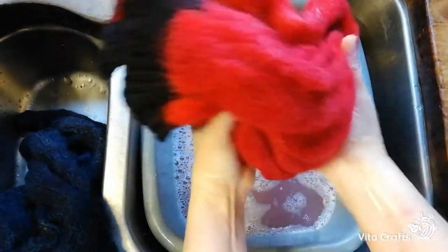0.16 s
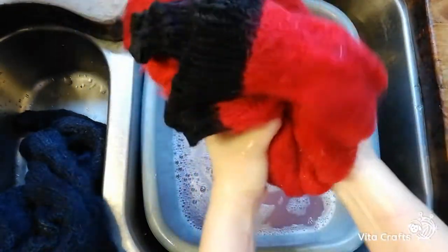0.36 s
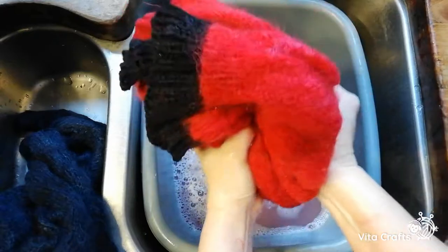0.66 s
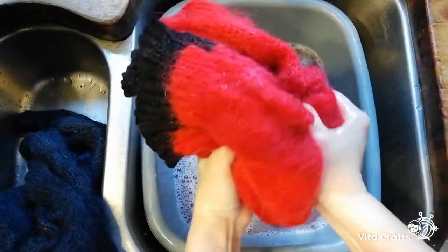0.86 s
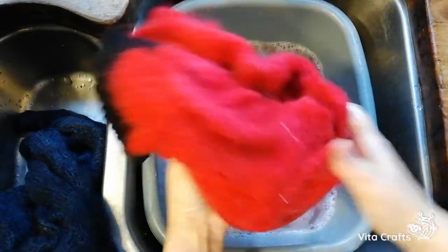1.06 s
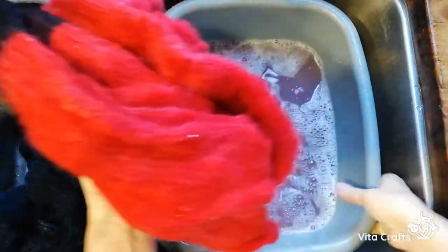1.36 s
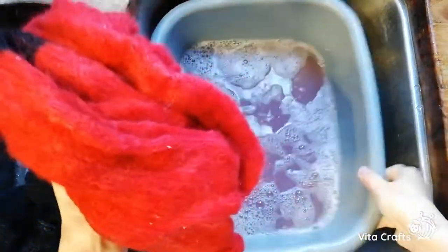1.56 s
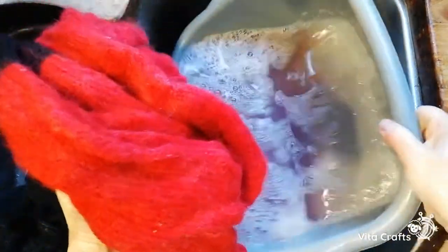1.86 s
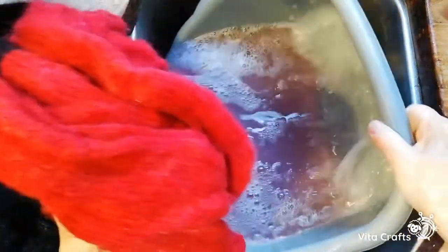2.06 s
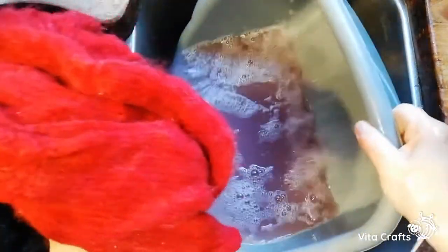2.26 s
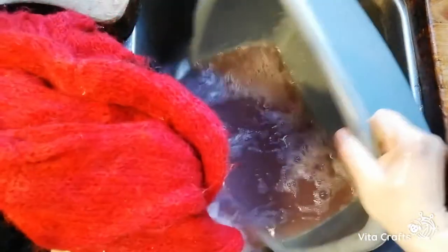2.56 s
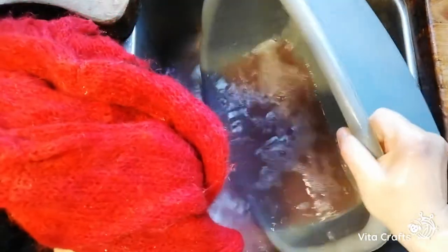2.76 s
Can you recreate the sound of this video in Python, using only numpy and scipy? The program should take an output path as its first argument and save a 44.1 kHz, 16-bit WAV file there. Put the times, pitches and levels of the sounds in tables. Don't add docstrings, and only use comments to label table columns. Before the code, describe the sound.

Water wrung from wet wool patters into a plastic basin, which then scrapes, knocks and pours

```python
import sys
import numpy as np
from scipy import signal
from scipy.io import wavfile

SR = 44100
rng = np.random.default_rng(int(sys.argv[2]) if len(sys.argv) > 2 else 0)


def generate_wav(sig):
    pcm = np.round(np.clip(np.atleast_2d(sig).T, -1, 1) * 32767).astype(np.int16)
    wavfile.write(sys.argv[1], SR, pcm)


def elevation(decibels):
    levels = np.asarray(decibels, float)
    return 10 ** (levels / 20)


N = 127890

# time [s], spatter level [dB], large bubbles relative to spatter [dB].
FLOW = [
    [(0, -95, 20), (.256, -54, -3), (.42, -51, -16), (.56, -39, -6), (.728, -39.5, -5.5), (.95, -46, -5.5),
     (1.106, -61, -11), (1.23, -74.5, 11.5)],
    [(1.4, -69.5, 10), (1.46, -49.5, 5.5), (1.6, -44.5, 1.5), (1.73, -48.5, 2), (1.79, -59, 1),
     (1.9, -74, 17.5)],
]
# start [s], spatter level [dB], fall
# [dB/s], large bubbles re spatter [dB].
SURGES = [(0.434, -37, 62, -11), (0.493, -41.5, 51, 4.5), (1.244, -47.5, 252, 4.5), (1.344, -46, 368, 10),
          (1.904, -48, 100, -7), (1.927, -34.5, 127, -3.5), (2.076, -38, 100, -20), (2.094, -32, 72, -4),
          (2.236, -32.5, 61, -4), (2.3, -41, 81, -19), (2.388, -34, 31, -1.5), (2.448, -39, 60, 9.5),
          (2.527, -31.5, 78, 2), (2.639, -38, 115, 8), (2.72, -72, 110, 2), (2.8, -51, 77, 8.5)]
# frequency [Hz], density [dB per Hz].
SPATTER_SPECTRUM = [(530, 37), (900, -20), (1170, -8.5), (1620, -11), (2270, -5.5), (3730, -6.5),
                    (8660, -3.5), (14900, -27), (16000, -21)]
# start [s], peak level [dB], pitch [Hz].
DROPS = [(0.0261, -31.5, 6030), (0.028, -28.5, 13200), (0.1127, -40, 5300), (0.1455, -37, 8240),
         (0.203, -41, 8200), (0.21, -28.5, 5450), (0.25, -28.5, 7550), (0.3302, -35, 8260),
         (0.391, -30, 5640), (0.4051, -19.5, 8040), (0.41, -21.5, 6400), (0.4471, -7, 7270),
         (0.495, -18.5, 6400), (0.5099, -15, 4430), (0.5487, -28, 9200), (0.6195, -23, 12200),
         (0.6259, -15, 4180), (0.642, -21.5, 9500), (0.6536, -24, 3960), (0.6952, -20.5, 4370),
         (0.7307, -21.5, 7000), (0.764, -21, 3430), (0.7661, -24, 10300), (0.849, -31, 14000),
         (0.8855, -16.5, 5700), (0.932, -23.5, 8880), (1.0745, -33, 13500), (2.5306, -13, 5200),
         (2.6424, -11.5, 8620), (2.72, -21.5, 4500), (2.7628, -22, 6960)]
# start [s], peak level [dB], pitch [Hz], t60 [s].
PLOPS = [(0.279, -40, 1760, 0.064), (0.295, -43, 3260, 0.071), (0.408, -37, 2890, 0.039),
         (0.439, -30, 2680, 0.03), (0.449, -32, 1910, 0.03), (0.45, -29, 2430, 0.037),
         (0.476, -27.5, 2620, 0.046), (0.509, -33, 1070, 0.018), (0.527, -31, 1110, 0.023),
         (0.589, -32, 3220, 0.034), (0.629, -34, 1830, 0.092), (0.647, -30.5, 1175, 0.044),
         (0.664, -49, 660, 0.07), (0.699, -31.5, 4290, 0.041), (0.81, -34.5, 5450, 0.03),
         (0.896, -28.5, 2720, 0.035), (0.911, -38.5, 1140, 0.046), (0.97, -41, 2110, 0.04),
         (1.03, -37, 2220, 0.018), (1.034, -39.5, 2700, 0.037), (1.062, -36.5, 1126, 0.059),
         (1.063, -45, 794, 0.066), (1.08, -46, 1136, 0.1), (1.115, -43, 3860, 0.032),
         (1.144, -53, 1090, 0.15), (1.256, -43, 1074, 0.063), (1.915, -39, 1500, 0.04),
         (1.926, -26.5, 1790, 0.026), (1.987, -34, 1600, 0.022), (2.077, -38, 2580, 0.04),
         (2.118, -29.5, 1273, 0.081), (2.135, -19.5, 820, 0.016), (2.149, -30, 1260, 0.15),
         (2.188, -36, 2320, 0.024), (2.238, -29, 1113, 0.14), (2.26, -34, 1930, 0.088),
         (2.291, -29, 1500, 0.12), (2.385, -23.5, 1120, 0.029), (2.399, -24.5, 880, 0.034),
         (2.471, -23.5, 2790, 0.03), (2.543, -27, 1340, 0.079), (2.652, -16.5, 1138, 0.036),
         (2.699, -25.5, 1660, 0.038)]
# time [s], level [dB].
RUB = [
    [(1.235, -48), (1.25, -48), (1.31, -39), (1.35, -37), (1.43, -40.5), (1.5, -38.5), (1.72, -37.5),
     (1.9, -47)],
    [(1.93, -39.5), (2.05, -45), (2.13, -38), (2.4, -41.5), (2.47, -32.5), (2.6, -36.5), (2.9, -47.5)],
]
# start [s], peak level [dB], pitch favoured by the struck spot [Hz].
KNOCKS = [(0.072, -47.5, 740), (0.137, -44.5, 544), (0.181, -36.5, 524), (0.202, -43, 540),
          (0.26, -37, 390), (0.437, -32, 700), (0.49, -25, 506), (0.509, -42, 554), (0.625, -24.5, 450),
          (0.662, -19.5, 453), (0.753, -25, 486), (0.856, -35.5, 460), (0.882, -35, 475), (0.961, -31, 540),
          (1.241, -30, 440), (1.253, -30.5, 420), (1.28, -34, 426), (1.327, -21, 330), (1.347, -18, 560),
          (1.36, -26, 480), (1.396, -28.5, 250), (1.476, -23, 330), (1.495, -24.5, 282), (1.564, -25, 340),
          (1.6, -22.5, 430), (1.7, -21, 284), (1.808, -25, 490), (1.938, -17, 510), (2.101, -36, 324),
          (2.131, -16.5, 263), (2.169, -24, 230), (2.24, -16.5, 256), (2.426, -20, 150),
          (2.459, -10.5, 238), (2.472, -16.5, 248), (2.51, -12, 454), (2.53, -19.5, 500),
          (2.564, -13.5, 340), (2.632, -19, 250), (2.692, -30.5, 230), (2.799, -34.5, 400),
          (2.861, -27.5, 360)]
# frequency [Hz], level [dB], t60 [s].
BASIN_MODES = [(67, -9.5, 0.015), (113, -16.5, 0.16), (178.5, -13.5, 0.13), (254.7, 1, 0.042),
               (352, -3, 0.047), (457.8, -0.5, 0.055), (545, -10.5, 0.21), (691, -8, 0.14),
               (765, -8, 0.044), (1076, -2.5, 0.18), (1214, 13.5, 0.009), (1550, -33, .05),
               (2030, -16, 0.043)]
# start [s], peak level [dB], pitch [Hz], t60 [s].
FLEXES = [(1.352, -36, 76, 0.22), (1.469, -34, 67, 0.36), (1.697, -36, 77, 0.25), (1.809, -28, 116, 0.14),
          (1.81, -33.5, 62.2, 0.48), (1.832, -34.5, 106, 0.26), (1.895, -36, 79, 0.11),
          (2.457, -30.5, 66.9, 0.76), (2.459, -36.5, 113, 0.74)]
# frequency [Hz], density [dB per Hz].
HUSH_SPECTRUM = [(12, -30), (20, 9), (60, -13.5), (234, -3), (542, -27.5), (642, -6), (738, -21.5),
                 (7520, -11.5), (16000, -22)]

SQUEEZE_ENDS_S, SURGE_RISE_S = 1.235, 0.0067
FIZZ_PER_S, FIZZ_CYCLES, FIZZ_DB, POUR_FIZZ_DB = 1100, 14.0, -1.5, -8
HISS_DB, POUR_HISS_DB, HISS_PATCHY_DB = -5.5, -1, 2.6
BUBBLES_PER_S, BUBBLE_RISE_PER_CYCLE = 420, 0.008
LARGE_BUBBLE_CYCLES, SMALL_BUBBLE_CYCLES = 7.5, 30
SMALL_BUBBLES_DB, POUR_SMALL_BUBBLES_DB, GURGLE_DB = -3.0, -4.9, -6.0
DRUM_DB, DRUM_PER_S, DRUM_SPOT_HZ = -6.5, 300, 520

DROP_T60_S, DROP_LOW_HZ = 0.0097, 2200
SNAP_DB, SNAP_CYCLES, SNAP_T60_S = 3, 2.5, 0.003
SPRAY_DB, SPRAY_T60_S = -11, 0.057
PLOP_RISE_PER_S, PLOP_ROUGHNESS = 1.24, 0.35

SLIPS_PER_S, SLIP_HZ, RUB_SPOT_HZ = 260, 625, 330
SPOT_DB_PER_OCTAVE = 10.5
KNOCK_BOOM_DB, KNOCK_HARD_HZ, KNOCK_LOW_SHARE = 1.5, 1550, 0.27
CHATTER_S, CHATTER_SHARE = 0.017, 0.37
KNOCK_DAMPING, THUD_DB = 0.69, -5.0
FLEX_SAG_SHARE = 0.16

SINK_T60_S, SINK_DB, SINK_CUT_HZ = 0.25, -10, 5000
PLOP_ECHO_DB, PLOP_ECHO_SMEAR_HZ = -4, 100
HUSH_DB = -56
HUM_HZ, HUM_DB, HUM_T60_S = 51.2, -52.5, 0.27
CUTOFF_HZ = 16650


def water():
    fine_gain, large_gain = flow()
    squeezing = np.arange(N) < SQUEEZE_ENDS_S * SR

    fizz = grains(random_clicks(FIZZ_PER_S, spread_db=1.23), 3040, 15300, FIZZ_CYCLES)
    fizz = fizz * elevation(np.where(squeezing, FIZZ_DB, POUR_FIZZ_DB))
    hiss = banded_noise(SPATTER_SPECTRUM, 1650, HISS_PATCHY_DB)
    hiss = hiss * elevation(np.where(squeezing, HISS_DB, POUR_HISS_DB))
    small = bubbles(1781, 9140, SMALL_BUBBLE_CYCLES)
    small = small * elevation(np.where(squeezing, SMALL_BUBBLES_DB, POUR_SMALL_BUBBLES_DB))

    rush = banded_noise([(400, 2.0), (2000, -1.0), (2600, -46)], 410, patchy_db=1.0)
    gurgle = bubbles(419.0, 2470, LARGE_BUBBLE_CYCLES) + 1.06 * rush
    hits = soften(random_clicks(DRUM_PER_S, spread_db=0.82), 1600)
    drum = squeezing * elevation(DRUM_DB) * rms_one(body(hits, boom_db=13.0, spot_hz=DRUM_SPOT_HZ))
    return fine_gain * (fizz + hiss + small) + large_gain * (elevation(GURGLE_DB) * gurgle + drum)


def flow():
    flow_db, large_db = in_time(FLOW)
    t = np.arange(N) / SR
    fine_power, large_power = elevation(2 * flow_db), elevation(2 * (flow_db + large_db))
    for start_s, db, fall_db_per_s, large_db in SURGES:
        rise = np.clip((t - start_s) / SURGE_RISE_S, 0, 1)
        power = rise * elevation(2 * (db - fall_db_per_s * np.maximum(t - start_s, 0)))
        fine_power = fine_power + power
        large_power = large_power + power * elevation(2 * large_db)
    return np.sqrt(fine_power), np.sqrt(large_power)


def grains(clicks, low_hz, high_hz, cycles):
    dealt = rng.integers(0, 40, N)
    out = np.zeros(N)
    for k, hz in enumerate(np.geomspace(low_hz, high_hz, 40)):
        out += elevation(at_hz(SPATTER_SPECTRUM, hz)) * hz * ring(clicks * (dealt == k), hz, cycles / hz)
    return rms_one(out)


def bubbles(low_hz, high_hz, cycles):
    out, t = np.zeros(N + SR), np.arange(1800) / SR
    for when, size, luck in rng.random((int(BUBBLES_PER_S * N / SR), 3)):
        cycle = low_hz * (high_hz / low_hz) ** size * t
        level_db = -60 * cycle / cycles - 2.0 * np.log(luck + 0.012)
        swell = np.minimum(cycle / 2.37, 1) * elevation(level_db)
        tone = np.sin(2 * np.pi * cycle * (1 + BUBBLE_RISE_PER_CYCLE * cycle))
        out[int(when * N):][:1800] += swell * tone
    return rms_one(out[:N])


def drops():
    out, t = np.zeros(N + SR), np.arange(3000) / SR
    attack = np.minimum(t / 0.00051, 1)
    for (start_s, db, hz), noise in zip(DROPS, rng.standard_normal((len(DROPS), 3000))):
        tone = np.sin(2 * np.pi * hz * t) * elevation(-60 * t / DROP_T60_S)
        snap = rms_one(ring(noise, 1.6 * hz, SNAP_CYCLES / hz)) * elevation(SNAP_DB - 60 * t / SNAP_T60_S)
        spray = rms_one(ring(noise, hz, 12.0 / hz)) * elevation(SPRAY_DB - 60 * t / SPRAY_T60_S)
        out[int(start_s * SR):][:3000] += elevation(db - 4.0) * attack * (tone + snap + spray)
    return high_pass(out[:N], DROP_LOW_HZ)


def plops():
    out, t = np.zeros(N + SR), np.arange(6000) / SR
    attack = np.minimum(t / 0.00029, 1)
    for (start_s, db, hz, t60_s), noise in zip(PLOPS, rng.standard_normal((len(PLOPS), 6000))):
        tone = np.sin(2 * np.pi * hz * t * (1 + PLOP_RISE_PER_S * t))
        rough = PLOP_ROUGHNESS * rms_one(ring(noise, hz, 20.0 / hz))
        out[int(start_s * SR):][:6000] += elevation(db - 60 * t / max(t60_s, 0.005)) * attack * (tone + rough)
    return out[:N]


def basin():
    return high_pass(rubbing() + knocks(), 45)


def rubbing():
    rub_db, = in_time(RUB)
    slips = soften(random_clicks(SLIPS_PER_S, spread_db=1.95), SLIP_HZ)
    return elevation(rub_db - 4.5) * rms_one(body(slips, boom_db=1.0, spot_hz=RUB_SPOT_HZ))


def knocks():
    out, t = np.zeros(N + SR), np.arange(9000) / SR
    for (start_s, db, hz), luck in zip(KNOCKS, rng.standard_normal((len(KNOCKS), 9000))):
        contacts = CHATTER_SHARE * luck * (abs(luck) > 2.6) * np.exp(-t / CHATTER_S)
        contacts[0] += 1
        contacts = soften(contacts, KNOCK_HARD_HZ) - soften(contacts, KNOCK_LOW_SHARE * hz)
        hit = body(contacts, KNOCK_BOOM_DB, hz, KNOCK_DAMPING)
        thud = ring(contacts, 1.22 * hz, 0.82 / hz)
        knock = hit / np.abs(hit).max() + elevation(THUD_DB) * thud / np.abs(thud).max()
        out[int(start_s * SR):][:9000] += elevation(db - 8.0) * knock
    return out[:N]


def body(clicks, boom_db, spot_hz, damping=1):
    out = 0
    for k, (hz, db, t60_s) in enumerate(BASIN_MODES):
        gain_db = boom_db if k < 2 else -SPOT_DB_PER_OCTAVE * abs(np.log2(hz / spot_hz))
        out = out + (-1) ** k * elevation(db + gain_db) * ring(clicks, hz, damping * t60_s)
    return out


def flexes():
    out, t = np.zeros(N + SR), np.arange(SR // 2) / SR
    bent_t = t + FLEX_SAG_SHARE * 0.028 * (1 - np.exp(-t / 0.032))
    for start_s, db, hz, t60_s in FLEXES:
        out[int(start_s * SR):][:len(t)] += elevation(db - 60 * t / t60_s) * np.sin(2 * np.pi * hz * bent_t)
    return out[:N]


def sink(x):
    t = np.arange(SR // 2) / SR
    echoes = soften(rng.standard_normal(len(t)), SINK_CUT_HZ) * elevation(-60 * t / SINK_T60_S) * (t > 0.003)
    return signal.fftconvolve(x, echoes / np.linalg.norm(echoes))[:N]


def hush():
    return elevation(HUSH_DB) * banded_noise(HUSH_SPECTRUM, 20.26, patchy_db=3.5)


def hum():
    return elevation(HUM_DB) * rms_one(ring(rng.standard_normal(N + SR), HUM_HZ, HUM_T60_S)[SR:])


def banded_noise(spectrum, low_hz, patchy_db):
    edges_hz = low_hz * 2 ** np.arange(0, np.log2(18000 / low_hz), 0.5)
    together = drift(10.7)
    white = rng.standard_normal((2, N))
    out = 0
    for k, (low, high) in enumerate(zip(edges_hz, edges_hz[1:])):
        band_pass = signal.butter(2, [low, high], "band", fs=SR, output="sos")
        flicker_db = patchy_db * (0.52 * together + drift(24.0))
        level_db = at_hz(spectrum, np.sqrt(low * high)) + flicker_db
        out = out + elevation(level_db) * signal.sosfilt(band_pass, white[k % 2])
    return rms_one(out)


def random_clicks(per_s, spread_db):
    sizes = elevation(spread_db * np.minimum(rng.exponential(1, N), 4)) * rng.choice([-1, 1], N)
    return sizes * (rng.random(N) < per_s * elevation(2.5 * drift(30)) / SR)


def drift(rate_hz):
    r = np.exp(-2 * np.pi * rate_hz * 40 / SR)
    noise = rng.standard_normal(N // 40 + 2002)
    slow = signal.lfilter([1], [1, -2 * r, r * r], noise)[2000:]
    return np.interp(np.arange(N) / 40, np.arange(len(slow)), rms_one(slow))


def ring(clicks, hz, t60_s):
    r, w = elevation(-60 / (t60_s * SR)), 2 * np.pi * hz / SR
    return signal.lfilter([0, np.sin(w)], [1, -2 * r * np.cos(w), r * r], clicks + 1e-18)


def soften(x, hz):
    r = np.exp(-2 * np.pi * hz / SR)
    return signal.lfilter([(1 - r) ** 2], [1, -2 * r, r * r], x)


def high_pass(x, hz):
    return signal.sosfilt(signal.butter(2, hz, "high", fs=SR, output="sos"), x)


def rms_one(x):
    return x / np.sqrt(np.mean(x ** 2) + 1e-20)


def in_time(tables, silent_db=-90):
    s, *columns = np.transpose([row for table in tables for row in table])
    return [np.interp(np.arange(N) / SR, s, column, left=silent_db) for column in columns]


def at_hz(spectrum, hz):
    points_hz, points_db = np.transpose(spectrum)
    return np.interp(np.log(hz), np.log(points_hz), points_db)


def scene():
    near, tones = drops() + water(), plops()
    smeared = elevation(PLOP_ECHO_DB) * drift(PLOP_ECHO_SMEAR_HZ) * tones
    echoes = elevation(SINK_DB) * sink(near + smeared)
    mix = near + tones + basin() + flexes() + echoes + hush() + hum()
    return mix[None]


def band_limit(x):
    return signal.sosfilt(signal.butter(12, 16630, fs=SR, output="sos"), x)


def record(dry):
    low_pass = signal.cheby2(14, 60, CUTOFF_HZ, fs=SR, output="sos")
    mix = signal.sosfilt(low_pass, dry)
    return band_limit(mix)


dry = scene()
out = record(dry)
generate_wav(out)
```